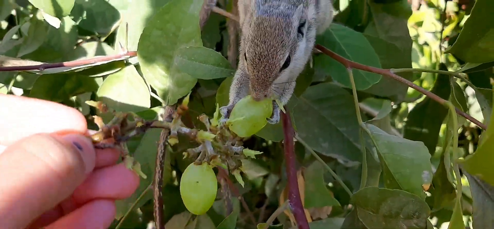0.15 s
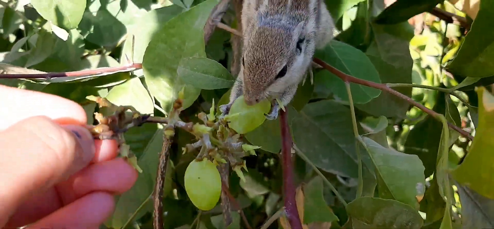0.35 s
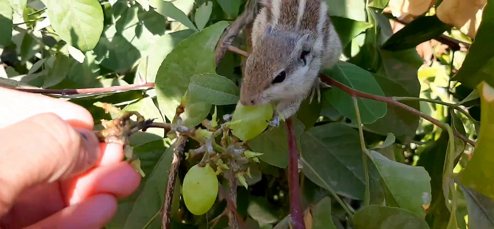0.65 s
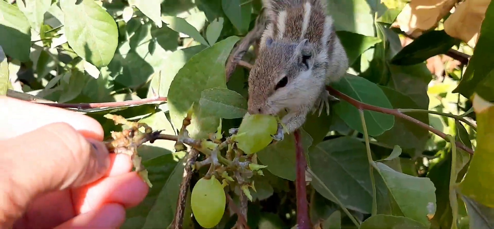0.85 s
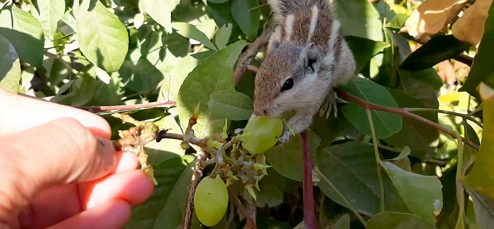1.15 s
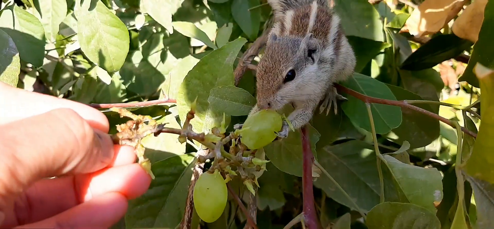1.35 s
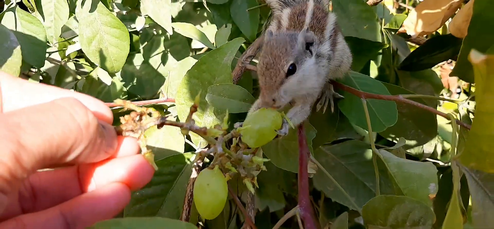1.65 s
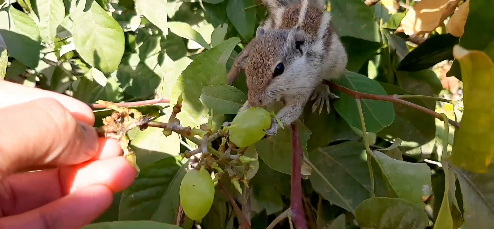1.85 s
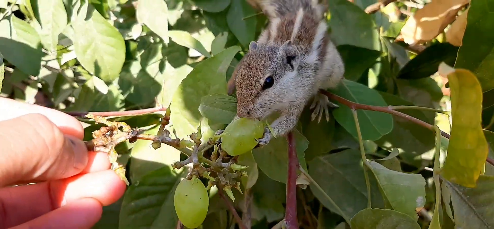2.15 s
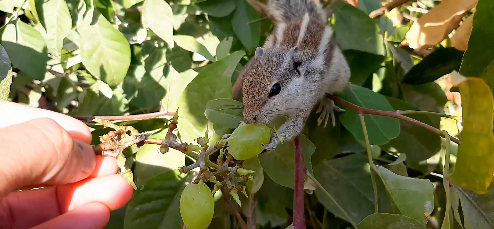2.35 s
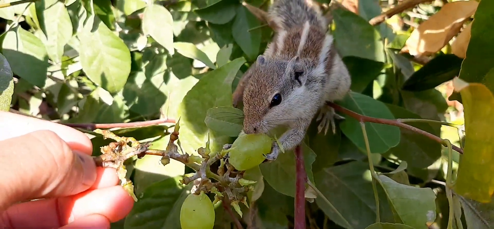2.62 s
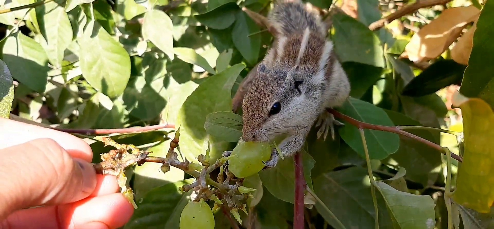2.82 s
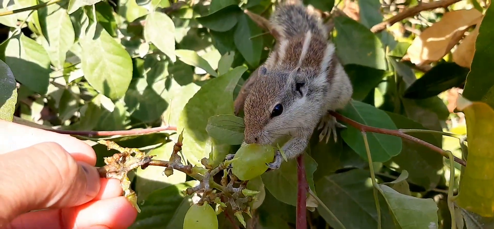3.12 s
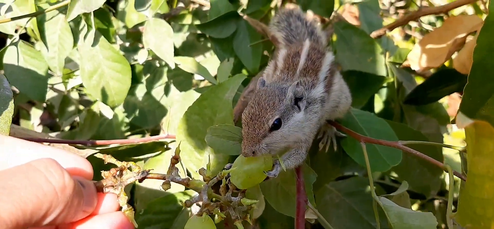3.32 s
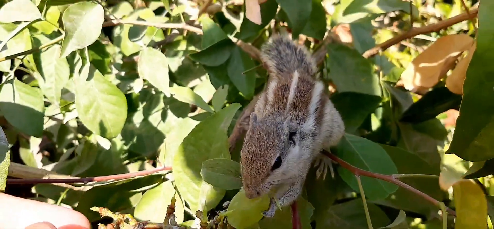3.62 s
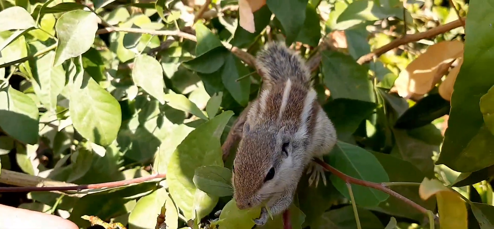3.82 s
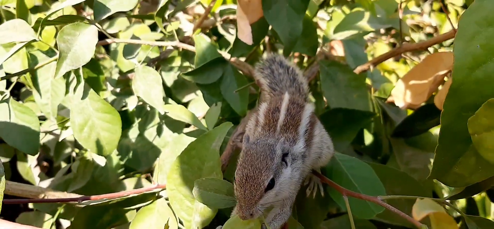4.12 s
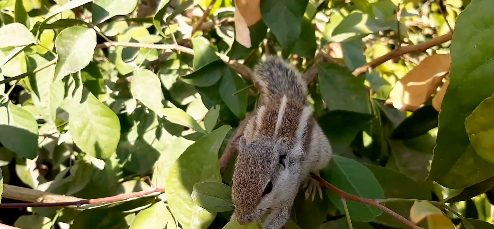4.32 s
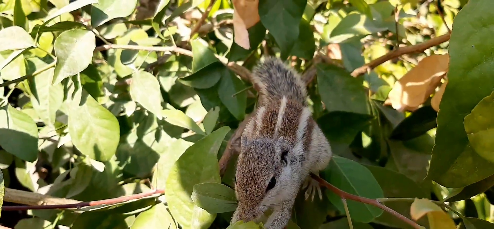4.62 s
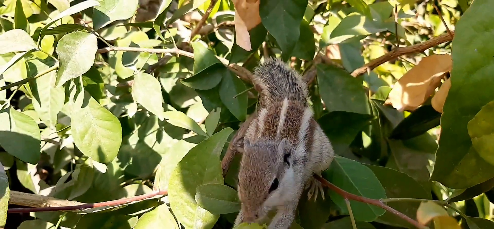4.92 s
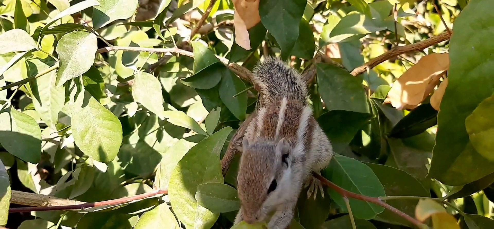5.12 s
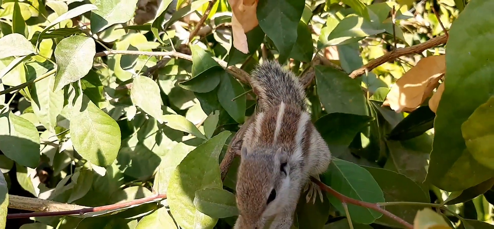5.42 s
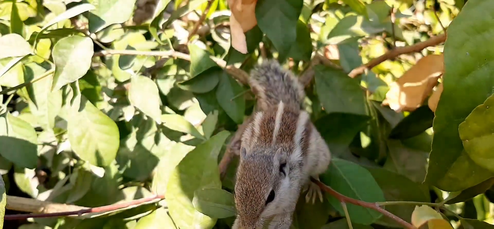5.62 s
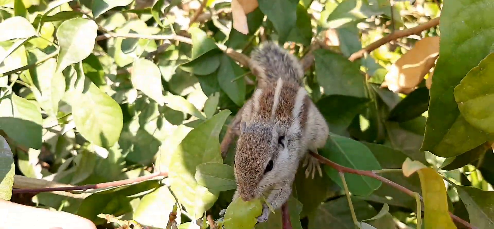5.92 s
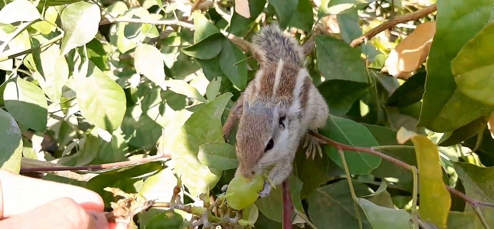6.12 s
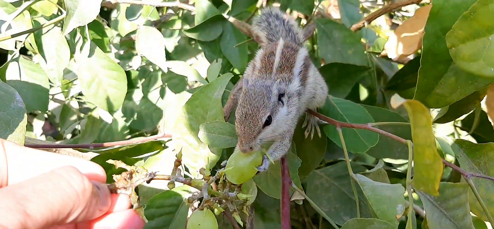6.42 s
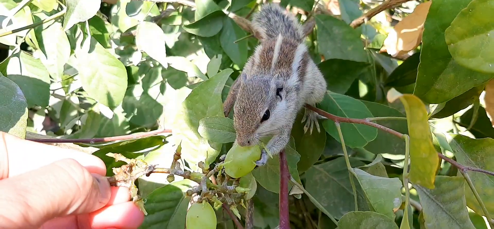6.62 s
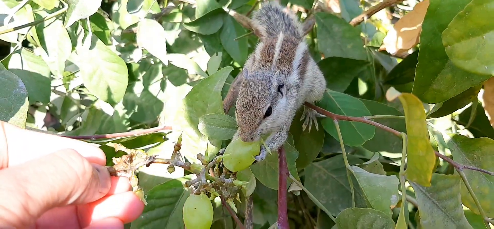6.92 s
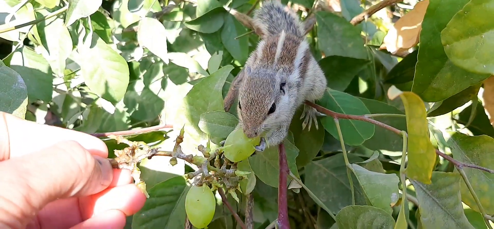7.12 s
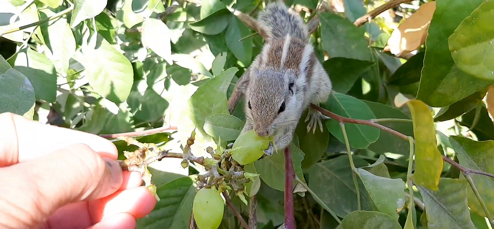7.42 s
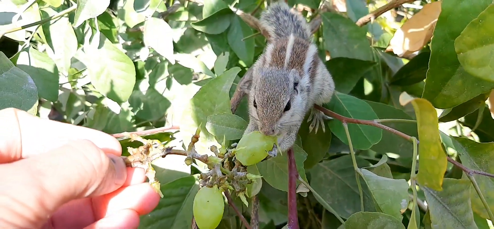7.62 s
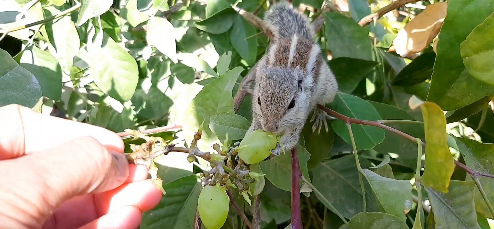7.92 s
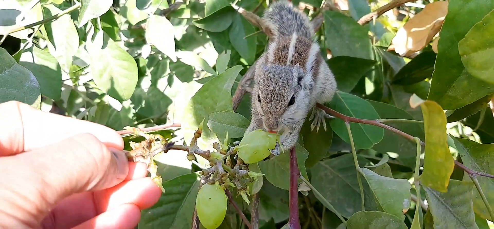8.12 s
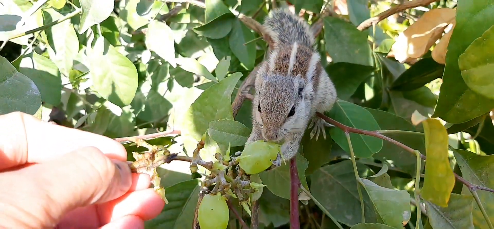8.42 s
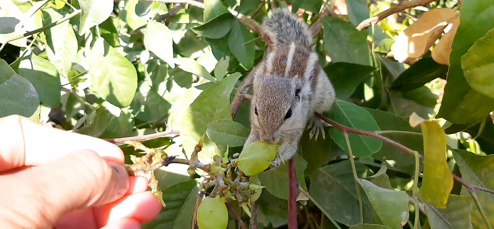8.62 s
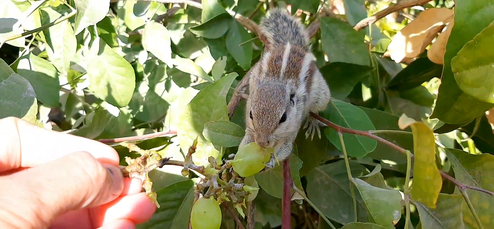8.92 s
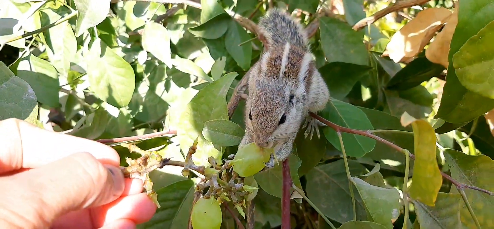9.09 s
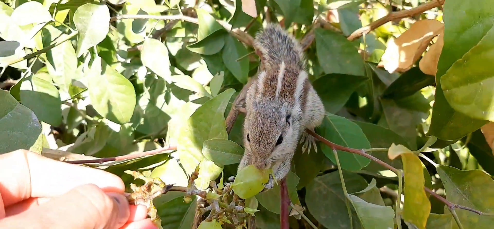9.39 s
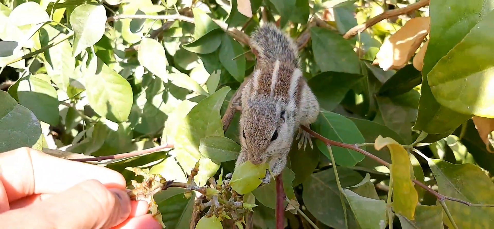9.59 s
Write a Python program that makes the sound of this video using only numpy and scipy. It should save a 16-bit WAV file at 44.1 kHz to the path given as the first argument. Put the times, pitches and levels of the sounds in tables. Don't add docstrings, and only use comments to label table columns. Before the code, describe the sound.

A small squirrel close by chirps in tight bursts of two to four very high, sharp notes, each burst starting highest and stepping down, repeating roughly every half to one second. A second animal farther off adds thin, blurred squeaks. Behind are distant traffic hum, soft hiss, occasional leaf rustle and faint birds; a far vehicle swells and fades. Late wind bumps the left side, and the chirps become hurried, then loudest.

```python
import sys
import numpy as np
from scipy import signal
from scipy.fft import rfft, irfft, next_fast_len
from scipy.io import wavfile
from scipy.ndimage import uniform_filter1d, map_coordinates

SR = 44100
rng = np.random.default_rng(int(sys.argv[2]) if len(sys.argv) > 2 else 0)


def to_linear_factor(level_db):
    exponent = np.asarray(level_db, float) / 20
    return 10 ** exponent


def unload_audio(sound):
    columns = np.transpose(np.atleast_2d(sound))
    steps = np.round(np.clip(columns, -1, 1) * 32767)
    wavfile.write(sys.argv[1], SR, steps.astype(np.int16))


N = 429969


def unit(x):
    return x / np.sqrt(np.mean(x ** 2) + 1e-20)


def along(points, hz):
    f, value = np.transpose(points)
    return np.interp(np.log(hz + 1), np.log(f + 1), value)


def level_curve(rows):
    times, levels = np.transpose(rows)
    return np.interp(np.arange(N) / SR, times, levels)


def swells(rows):
    t = np.arange(N) / SR
    return sum(to_linear_factor(db) * np.exp(-(2 * (t - middle) / length) ** 2) for middle, length, db in rows)


def wobble(rate):
    knots = rng.standard_normal(int(N * rate / SR) + 4)
    return map_coordinates(knots, [np.arange(N) * rate / SR])


def filtered(x, response):
    m = 2 * next_fast_len(N // 2 + SR // 4)
    return irfft(rfft(x, m) * response(np.fft.rfftfreq(m, 1 / SR)), m)[..., :N]


def causal(points):
    def response(hz):
        cepstrum = irfft(np.log(to_linear_factor(along(points, hz))))
        half = len(cepstrum) // 2
        cepstrum[1:half] *= 2
        cepstrum[half + 1:] = 0
        return np.exp(rfft(cepstrum))[:len(hz)]
    return response


def patchy(patchy_db):
    z = signal.stft(rng.standard_normal((2, N)), nperseg=512)[2]
    field = uniform_filter1d(rng.standard_normal(z.shape[1:]), size=4, axis=0)
    field = uniform_filter1d(field, size=14, axis=1)
    return signal.istft(z * to_linear_factor(patchy_db * unit(field)), nperseg=512)[1][:, :N]


# (time [s], level [dB])
HUM_LEVEL = [(0.0, -65), (1.03, -66), (2.28, -66), (2.5, -65), (5.46, -64.5), (5.78, -66), (7.44, -66),
             (7.6, -68.5), (7.98, -70), (8.83, -63.5), (9.23, -67.5), (9.75, -68)]
# (frequency [Hz], density [dB per Hz])
HUM_SPECTRUM = [(15, -71), (25, -19), (64, -0.5), (185, -3.5), (271, -7), (318, -11.5), (592, -12),
                (849, -16), (977, -16.5), (1520, -19.5), (1640, -19.5), (2830, -33), (3000, -32.5),
                (3900, -61), (6600, -120)]
# (frequency [Hz], left-right likeness [0-1])
HUM_COHERENCE = [(60, 0.97), (300, .9), (700, 0.1), (1400, 0.49), (3000, .1)]


def traffic_hum():
    bass_db = 15.5
    lead_s = 0.00038

    def mid_side(hz):
        turn = np.arccos(np.clip(along(HUM_COHERENCE, hz), -1, 1)) / 2
        whine_db = 6 * np.exp(-((hz - 1560) / 57) ** 2)
        return to_linear_factor(along(HUM_SPECTRUM, hz) + whine_db) * [np.cos(turn), np.sin(turn)]

    def lead(hz):
        return np.exp(1j * np.pi * hz * lead_s * np.array([[1], [-1]]))

    mid, side = filtered(patchy(2.0), mid_side)
    ports = unit(filtered(np.array([mid + side, mid - side]), lead))
    return to_linear_factor(level_curve(HUM_LEVEL) + bass_db + 0.8 * wobble(5)) * ports * to_linear_factor([[-1.8], [1.8]])


# (middle [s], length [s], level [dB])
STIRS = [(0.0, 0.24, -67.5), (0.233, 0.066, -67.5), (1.265, 0.26, -60), (2.112, 0.048, -71),
         (3.22, 0.23, -58.5), (3.72, 0.24, -72), (4.463, .24, -62.5), (0.75, 0.37, -76), (1.6, 0.33, -76),
         (2.65, .3, -73.5), (5.0, 0.39, -81), (5.8, 0.62, -81), (6.5, 0.32, -78.5), (7.12, 0.07, -62),
         (7.282, 0.45, -70.5), (8.483, 0.6, -58.5), (9.06, 0.11, -67), (9.3, 0.36, -80.5)]
# (frequency [Hz], density [dB per Hz])
RUSTLE_SPECTRUM = [(1180, -65.5), (2000, -15), (2430, -18.5), (3330, -4), (4180, -9.5), (4920, -14),
                   (7040, -20.5), (9000, -51.5), (11700, -81.5), (19800, -120)]


def leaf_rustle():
    still_db = -79.5
    motion = (to_linear_factor(still_db) + swells(STIRS)) * to_linear_factor(4.5 + 1.5 * wobble(12))
    noise = unit(filtered(patchy(3), lambda hz: to_linear_factor(along(RUSTLE_SPECTRUM, hz))))
    return motion * noise * to_linear_factor([[-3.5], [3.5]])


# (frequency [Hz], density [dB per Hz])
HISS_SPECTRUM = [(4710, -46.5), (8000, -27.5), (10400, -18.5), (11900, -8), (14100, -6.5), (15700, -13),
                 (16300, -20)]


def hiss():
    noise = unit(filtered(patchy(1.6), lambda hz: to_linear_factor(along(HISS_SPECTRUM, hz))))
    return to_linear_factor(-78.0) * noise * to_linear_factor([[-3.5], [3.5]])


def arch(top_hz, rise, fall, start_hz, end_hz, creep, bend, skew):
    t = np.arange(int((rise + fall) * SR)) / SR
    climb = creep * t / rise + (1 - creep) * np.sin(np.pi / 2 * t / rise) ** bend
    slide = np.exp(-(2.6 * np.clip((t - rise) / fall, 0, 1)) ** skew)
    return np.where(t < rise, start_hz + (top_hz - start_hz) * climb, end_hz + (top_hz - end_hz) * slide)


def voice(hz, partials_db, rough, breath_db, swell, fade):
    phase = 2 * np.pi * np.cumsum(hz) / SR
    tone = 0
    for k, db in enumerate(partials_db, start=1):
        tone = tone + to_linear_factor(db) * np.sin(k * phase) * (k * hz < 20000)
    noise = rng.standard_normal((2, 3000))[:, :len(hz)]
    flutter = 1 + rough * unit(uniform_filter1d(noise[0], size=30))
    t = np.arange(len(hz)) / SR
    envelope = np.clip(t / swell, 0, 1) ** 2 * np.clip(t[::-1] / fade, 0, 1)
    return (tone * flutter + to_linear_factor(breath_db) * noise[1]) * envelope


def tail(decay_times, delay):
    build_up_s = 0.72 * delay
    hz, t, z = signal.stft(rng.standard_normal((2, SR // 2)), SR, nperseg=128)
    h = signal.istft(z * to_linear_factor(-60 * t / along(decay_times, hz)[:, None]), SR, nperseg=128)[1]
    h = h * (1 - np.exp(-np.arange(h.shape[1]) / (SR * build_up_s)))
    return np.pad(h / np.linalg.norm(h[0]), ((0, 0), (int(delay * SR), 0)))


# (frequency [Hz], t60 [s])
LEAF_DECAY = [(2000, 0.12), (4000, 0.1), (8000, 0.059), (15000, 0.025)]
# (frequency [Hz], t60 [s])
YARD_DECAY = [(2000, 0.68), (4000, 0.34), (8000, 0.27), (15000, 0.1)]


def scatter_response(leaves_db, yard_db):
    leaves = np.pad(tail(LEAF_DECAY, 0.00085), ((0, 0), (0, SR // 10)))[:, :SR // 2]
    yard = tail(YARD_DECAY, 0.012)[:, :SR // 2]
    return to_linear_factor(leaves_db) * leaves + to_linear_factor(yard_db) * yard


# (delay [s], level [dB])
CLOSE_ECHOES = [
    [(.0025, -9), (.0011, -11)],
    [(.0024, -5), (.0008, -6)],
]


def heard(calls, left, right, leaves_db, yard_db):
    poses = 3
    lag_s = .00018
    emitted = np.zeros((poses, N + SR))
    for k, (start, call) in enumerate(sorted(calls, key=lambda row: row[0])):
        emitted[k % poses, round(start * SR):][:len(call)] += call

    def close_paths(hz):
        comb = [1 + sum(to_linear_factor(db) * np.exp(-2j * np.pi * hz * s) for s, db in port) for port in CLOSE_ECHOES]
        return np.array(comb) * np.exp(1j * np.pi * hz * lag_s * np.array([[1], [-1]]))

    scatter = 0
    for part in emitted:
        response = scatter_response(leaves_db, yard_db)
        scatter = scatter + signal.oaconvolve(part[None, :N], response, axes=1)[:, :N]
    direct = filtered(emitted.sum(0)[:N], close_paths)
    return filtered(direct + scatter, lambda hz: np.array([causal(left)(hz), causal(right)(hz)]))


# (time of top [s], level [dB], top pitch [Hz])
HIGH_CHIRPS = [(0.2763, -20.5, 7820), (0.9552, -20.5, 7570), (1.661, -23, 7800), (2.2419, -23.5, 7600),
               (2.8081, -22.5, 7840), (3.3828, -20, 7450), (3.9729, -23.5, 7275), (4.5466, -21.5, 7480),
               (5.2004, -23, 7275), (6.1104, -21.5, 7270), (6.822, -18, 7940), (6.886, -16.5, 7870),
               (7.4031, -21.5, 7630), (8.132, -24.5, 7440)]
# (time of top [s], level [dB], top pitch [Hz])
LOW_CHIRPS = [(0.3432, -18.5, 6620), (0.409, -18.5, 6095), (0.4862, -24, 5780), (1.0233, -21.5, 6506),
              (1.098, -23, 6200), (1.7313, -20, 6700), (1.8009, -22, 5990), (2.3142, -21, 6020),
              (2.394, -24.5, 5660), (2.8796, -21, 6380), (2.9483, -23, 5640), (3.4504, -19, 5915),
              (3.519, -21, 5760), (4.0408, -20, 6520), (4.1145, -22.5, 5420), (4.6172, -20, 6195),
              (4.6903, -23, 5600), (5.262, -19, 6310), (5.3296, -18, 5865), (5.4039, -23, 5690),
              (6.178, -21.5, 6510), (6.254, -24, 6110), (6.9572, -17.5, 6715), (7.466, -19, 6890),
              (7.5378, -21.5, 5663), (8.1919, -21, 6350), (8.2622, -24, 5495)]
# (time of top [s], level [dB], top pitch [Hz])
QUICK_CHIRPS = [
    (8.782, -20.5, 6900),
    (8.841, -19.5, 6150),
    (8.909, -22.5, 5330),
]
# (time of top [s], level [dB], top pitch [Hz])
LOUD_CHIRPS = [
    (9.4325, -20, 7700),
    (9.489, -14.5, 8000),
    (9.547, -15.5, 8040),
    (9.6125, -20, 5700),
]
# (frequency [Hz], gain [dB])
CHIRP_LEFT = [(1500, -20), (2500, -14), (3050, -7.5), (3750, -1), (4400, -6.5), (5500, -7.5), (7300, -9),
              (8000, 9.5), (8700, -5), (10000, -12.5), (11500, -8), (13500, -11.5), (15500, 0.5),
              (17000, -24)]
CHIRP_RIGHT = [(1500, -24), (2550, -2.5), (3050, 0), (3800, 2), (4500, 0.5), (5400, -10.5), (6800, -6.5),
               (7800, 5), (8800, -27), (10000, -26), (11500, -9), (13500, -12), (15500, -8), (17000, -10)]


def squirrel():
    # chirps, climb [s], slide [s], share of the climb that creeps evenly [0-1], lowest end [Hz]
    kinds = [(HIGH_CHIRPS, .0125, .024, .25, 2100),
             (LOW_CHIRPS, .0135, .021, .25, 2150),
             (QUICK_CHIRPS, .011, .015, .3, 1700),
             (LOUD_CHIRPS, .014, .016, .8, 1500)]
    calls = []
    for rows, climb, slide, creep, low_hz in kinds:
        for top_s, db, top_hz in rows:
            end_hz = low_hz + .25 * top_hz
            hz = arch(top_hz, climb, slide, start_hz=2139, end_hz=end_hz, creep=creep, bend=7, skew=1.915)
            t = np.arange(len(hz)) / SR
            second_db = np.interp(t, [0, 0.47 * climb, climb + slide], [-8, -6, -17])
            call = voice(hz, [0, second_db, -17], rough=.35, breath_db=-14, swell=0.008, fade=0.0094)
            calls.append((top_s - climb, to_linear_factor(db + 2.5) * call))
    return heard(calls, CHIRP_LEFT, CHIRP_RIGHT, leaves_db=-5, yard_db=-14)


# (start [s], level [dB], top pitch [Hz], rise [s])
SQUEAK_CALLS = [(0.8477, -30, 18530, 0.013), (0.9296, -29, 15570, 0.014), (3.3014, -28, 16130, 0.014),
                (3.3823, -29, 14700, 0.031), (5.281, -26, 16160, 0.04), (5.364, -29.5, 15530, 0.013),
                (5.934, -33.5, 16780, 0.018), (6.0145, -31, 15200, 0.025), (6.6581, -33, 15500, 0.013),
                (6.7383, -30, 14370, 0.014), (8.5184, -30.5, 16900, 0.018), (8.5967, -29.5, 15180, 0.027),
                (8.6924, -29.5, 15400, 0.018), (9.429, -29.5, 16500, 0.023), (9.509, -30, 15050, 0.039)]
# (frequency [Hz], gain [dB])
SQUEAK_LEFT = [(1500, -41.5), (3000, -11.5), (3900, -2.5), (4600, 0.5), (5400, -20), (7500, -16),
               (8700, -20.5), (10500, -7.5), (12000, -10), (14000, -11), (15600, 1), (17000, -27)]
SQUEAK_RIGHT = [(1500, -21.5), (3000, -5), (3900, 4), (4600, 6), (5400, -6.5), (7500, -13.5), (8500, -19),
                (9800, -2), (10800, -4.5), (12500, -9.5), (14000, -2.5), (15600, 1.5), (17000, -26.5)]


def neighbour():
    calls = []
    for start, db, top_hz, rise in SQUEAK_CALLS:
        climb = min(rise, .014) + 0.0036
        hz = arch(top_hz, climb, 0.017, start_hz=3292, end_hz=0.23 * top_hz, creep=0.24, bend=1.4, skew=5.8)
        fading = to_linear_factor(np.linspace(6, -14, len(hz)))
        call = voice(hz, [0, -18], rough=.25, breath_db=-13, swell=0.0052, fade=0.026)
        calls.append((start + 0.00055, to_linear_factor(db + 7.0) * fading * call))
    return heard(calls, SQUEAK_LEFT, SQUEAK_RIGHT, leaves_db=6.5, yard_db=3.5)


# (start [s], length [s], pitch [Hz], level [dB])
BIRD_TWITTERS = [(1.185, 0.14, 5320, -56.5), (3.11, 0.072, 5200, -57), (3.142, .06, 3330, -57),
                 (3.144, 0.096, 6830, -60), (3.178, 0.072, 4800, -57), (3.217, 0.066, 5800, -56),
                 (4.168, 0.21, 3990, -52.5), (4.23, 0.038, 4300, -49), (4.248, 0.19, 4900, -62),
                 (4.38, 0.12, 7650, -69), (4.353, 0.13, 3450, -74), (7.073, 0.22, 3230, -61.5),
                 (7.095, 0.33, 2750, -61.5), (7.1, 0.33, 5000, -77), (7.202, 0.094, 1424, -57),
                 (7.225, 0.21, 1100, -58), (9.16, 0.14, 4740, -63.5)]


def twitters():
    out = np.zeros((2, N))
    for start, length, hz, db in BIRD_TWITTERS:
        t = np.arange(int(length * SR)) / SR
        drift = uniform_filter1d(rng.standard_normal((2, 2, SR // 2)), size=220)[..., :len(t)]
        tone = drift[0] * np.sin(2 * np.pi * hz * t) + drift[1] * np.cos(2 * np.pi * hz * t)
        envelope = signal.windows.tukey(len(t), .6)
        out[:, round(start * SR):][:, :len(t)] += to_linear_factor(db) * unit(tone) * envelope
    return out * to_linear_factor([[-2.5], [2.5]])


# (middle [s], length [s], level [dB])
VEHICLE_SWELLS = [
    (2.0, 0.19, -53.5),
    (2.6, 0.28, -52),
    (3.25, 0.35, -52.5),
    (3.85, .4, -56),
    (4.45, .4, -53.5),
    (5.0, 0.21, -52),
    (5.55, 0.29, -52),
]
# (frequency [Hz], density [dB per Hz])
ENGINE_SPECTRUM = [(150, -36.5), (230, 3), (320, -13), (480, -9.5), (700, -2), (850, -9), (1100, -50)]


def vehicle():
    drone = unit(filtered(patchy(2.1), lambda hz: to_linear_factor(along(ENGINE_SPECTRUM, hz))))
    return swells(VEHICLE_SWELLS) * drone * to_linear_factor([[-1.8], [1.8]])


# (time [s], level [dB])
WIND_LEVEL = [(7.9, -67), (8.3, -49.5), (8.85, -50.5), (8.92, -35), (9.07, -38.5), (9.12, -48), (9.2, -33),
              (9.3, -51.5), (9.75, -45)]
# (frequency [Hz], density [dB per Hz])
BUFFET_SPECTRUM = [(20, -5), (60, 1.5), (120, -3), (250, -19), (500, -55), (1000, -67)]
# (time [s], depth [dB], width [s])
LEFT_POPS = [
    (6.823, -17.5, 0.0012),
    (6.89, -8, 0.0013),
    (8.954, -14.5, 0.0021),
    (9.033, -8, 0.0016),
    (9.492, -8, 0.0012),
    (9.548, -13.5, 0.0018),
]


def wind_and_pops():
    t = np.arange(N) / SR
    onset = np.clip((t - WIND_LEVEL[0][0]) / 0.21, 0, 1)
    level = to_linear_factor(level_curve(WIND_LEVEL) + 7) * onset
    rumble = filtered(rng.standard_normal(N), lambda hz: to_linear_factor(along(BUFFET_SPECTRUM, hz)))
    buffeting = level * unit(to_linear_factor(2.1 * wobble(33)) * rumble)
    pushes = sum(-to_linear_factor(db) / (1 + ((t - s) / width) ** 2) for s, db, width in LEFT_POPS)
    return (buffeting + pushes) * to_linear_factor([[0], [-30]])


def scene():
    background = traffic_hum() + leaf_rustle() + hiss()
    left_gain_db = 1.03
    callers = (squirrel() + neighbour()) * to_linear_factor([[left_gain_db], [-left_gain_db]])
    return background + callers + twitters() + vehicle() + wind_and_pops()


def low_pass(x):
    return signal.sosfilt(signal.butter(12, 16520, fs=SR, output="sos"), x)


def record(dry):
    bass_cut = signal.butter(4, 54, "high", fs=SR, output="sos")
    mix = filtered(signal.sosfilt(bass_cut, dry), lambda hz: np.clip((16250 - hz) / 300, 0, 1))
    return low_pass(mix)


dry = scene()
out = record(dry)
unload_audio(out)
```